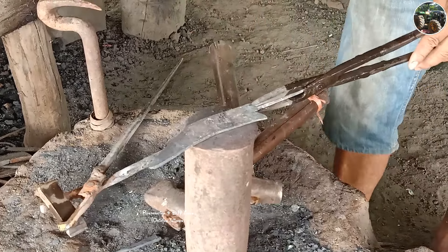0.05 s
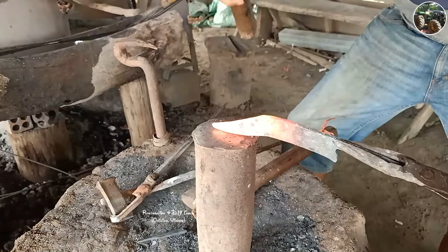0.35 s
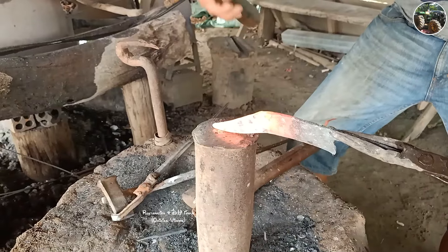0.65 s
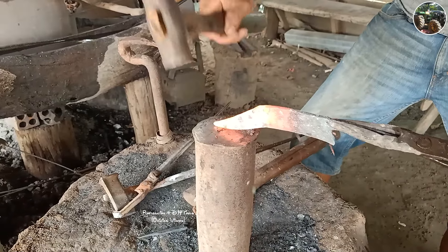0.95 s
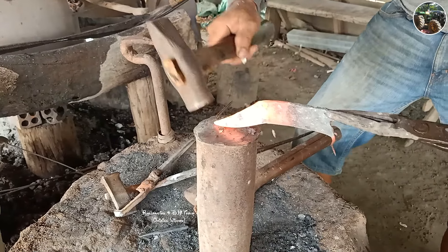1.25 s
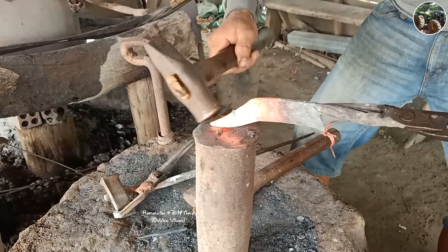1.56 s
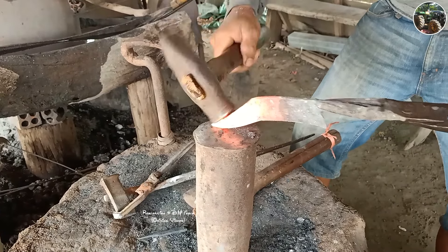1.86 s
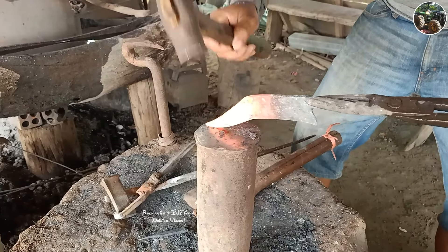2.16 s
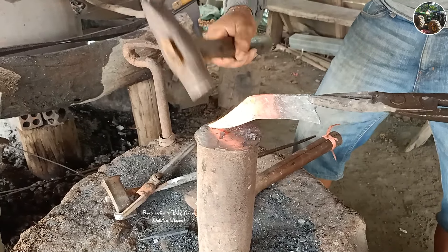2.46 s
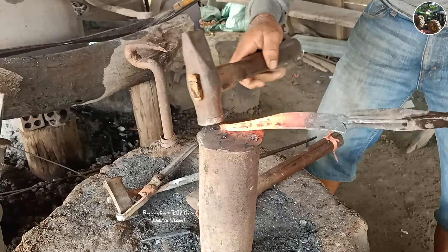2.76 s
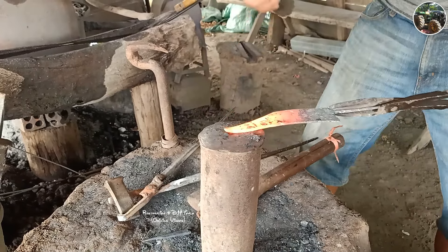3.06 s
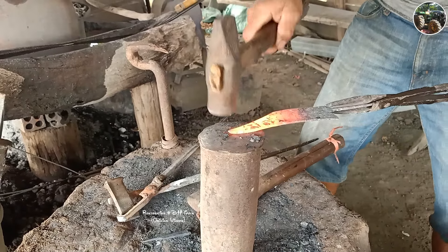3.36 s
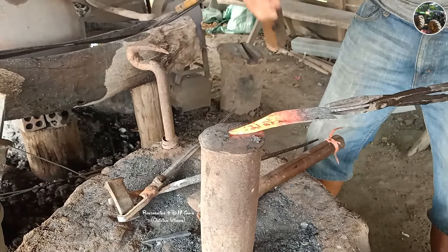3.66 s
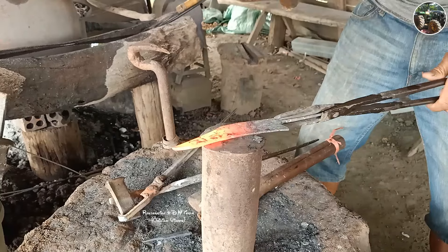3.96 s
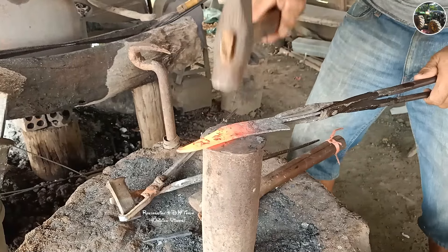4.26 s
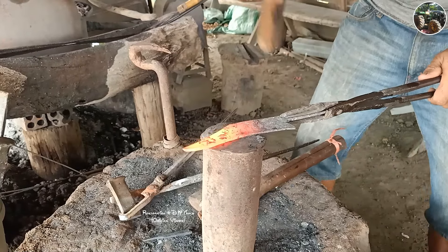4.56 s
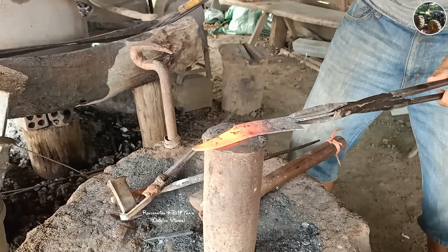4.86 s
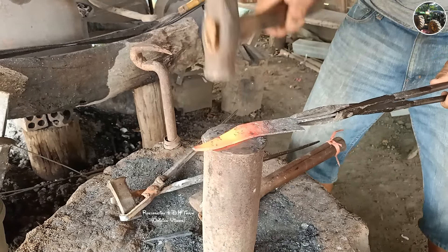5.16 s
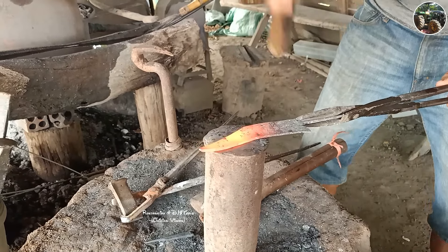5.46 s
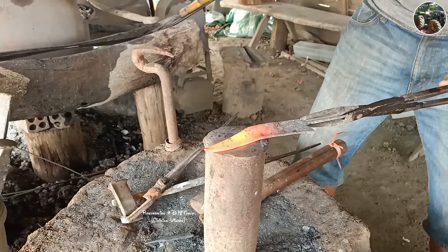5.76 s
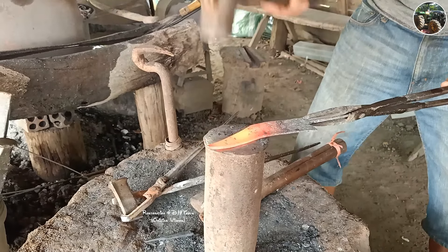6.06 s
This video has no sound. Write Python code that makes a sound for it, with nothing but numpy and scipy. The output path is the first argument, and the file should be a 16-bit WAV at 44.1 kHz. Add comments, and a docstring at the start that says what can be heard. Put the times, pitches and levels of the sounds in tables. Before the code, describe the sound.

A hand hammer strikes a hot steel blade on a small anvil set in a stump. Seven quick blows land as short clanks with a woody knock. The hammer drops and bounces in a fast fading rattle, then seven slower, brighter blows follow, loud enough to distort slightly. The microphone is close, with the anvil a little to the right, in an open shed with a very short echo and faint outdoor rush.

```python
"""A smith's hammer draws out a hot blade on a short post anvil set in a stump, under an open shed roof.
Seven blows land on the edge, the hammer drops and bounces, then seven flat blows overload the stereo
microphone, which stands close by with the anvil slightly to its right. Each contact briefly rings
stump, anvil, hammer head and blade. The shed answers over a soft outdoor rush and a faint far hum."""
import sys
import numpy as np
from scipy import signal
from scipy.fft import rfft, irfft, next_fast_len
from scipy.io import wavfile
from scipy.ndimage import uniform_filter1d, map_coordinates

SR = 44100
rng = np.random.default_rng(int(sys.argv[2]) if len(sys.argv) > 2 else 0)


def generate_wav(signal):
    """Clip the signal to [-1, 1] and save it as 16-bit WAV at the path in sys.argv[1]."""
    frames = np.transpose(np.atleast_2d(signal))
    scaled = np.clip(frames, -1, 1) * 32767
    pcm = np.round(scaled).astype(np.int16)
    wavfile.write(sys.argv[1], SR, pcm)


N = 274302
T = np.arange(SR // 4) / SR  # time within one contact [s]
CLOCK = np.arange(N) / SR  # time within the scene [s]


def hammering():
    """Blows, bounces and blade chatter, each with the shed's answer, heard slightly from the right."""
    # (time [s], strength [dB], flatness [0 = blade on edge, 1 = lying flat],
    #  hammer ring [dB], blade slap [dB], clank pitch [Hz])
    blows = [(0.5499, -10.5, .2, -4.5, -9.5, 1245), (0.9072, -9, 0.03, -15.5, -14, 1175),
             (1.2665, -9.5, 0.3, -5.5, -9, 1133), (1.618, -10, 0.32, -16, -9.5, 1212),
             (1.9557, -14.5, 0.24, -9, -5, 1176), (2.2853, -14.5, 0.52, -6, -2.5, 1172),
             (2.5765, -14, 0.35, -11.5, -4.5, 1175), (3.3996, -10, 0.68, -6.5, -13.5, 1316),
             (3.8059, -9.5, 0.77, 0.5, -5, 1300), (4.26, -10.5, 0.91, -3, -2.5, 1222),
             (4.7239, -11, 0.96, -1, -0.5, 1270), (5.1708, -9, 0.98, -1, -3.5, 1237),
             (5.6092, -10, 0.91, -6.5, -5, 1220), (6.0494, -12.5, 0.96, 1.5, -6.5, 1223)]
    # the loosely held hammer bounces on the anvil: (time [s], strength [dB])
    bounces = [(2.0017, -34), (2.782, -17.5), (2.8433, -21), (2.884, -23), (2.91, -25), (2.9311, -28),
               (2.951, -42.5)]
    # the blade springs back and touches the face: (time [s], strength [dB])
    chatter = [(1.6355, -36), (1.6531, -38)]
    sounds = [(s, amp(db) * contact(*stroke, crack_db=0)) for s, db, *stroke in blows]
    for s, db in bounces:  # bare steel rings the head, hardly the blade, and hardly cracks
        sounds.append((s, amp(db) * contact(0.46, ring_db=5, slap_db=-19, clank_hz=1258, crack_db=-10)))
    sounds += [(s, amp(db) * blade_zing()) for s, db in chatter]
    track = np.zeros((2, N))
    for s, sound in sounds:
        add(track, s, shed(sound))
    # balance at the microphone: (frequency [Hz], left minus right [dB])
    balance = [(60, -9.5), (200, 1), (450, 1.5), (750, -1.5), (1200, -2.5), (1800, 1), (2900, -6.5),
               (5000, -2), (8000, -4.5), (13000, -4)]
    pan = lambda hz: amp(np.array([[.5], [-.5]]) * along(balance, hz))
    bass_hz = 55  # small bodies radiate little bass
    return filtered(track, lambda hz: pan(hz) * 1j * hz / (bass_hz + 1j * hz))


def contact(flatness, ring_db, slap_db, clank_hz, crack_db):
    """One blow: a blade on edge cushions the hammer, so the stump knocks; flat contact rings the steel."""
    # modes of each body: (frequency [Hz], relative level [dB], t60 [s])
    face = [(1192.5, 3.5, 0.017), (1237, 6, 0.017), (1314.5, -11.5, .034), (1410, -29, 0.044)]
    post = [(2061, -12, .035), (2290, -11, .04), (2420, -13, .04), (2652, -3, .05), (2781, 0, .055),
            (2870, -6, .04), (2967, 0, .055)]
    post_high = [(8390, -3, .05), (9470, 0, .08)]
    head = [(3101, 4, 0.022), (3159, 0, .028), (3243, -13, 0.059), (3820, -20, 0.054), (5250, -24, 0.034)]
    edge = [(4210, -7, 0.022), (4286, -7, 0.086), (4380, -8.5, 0.021), (4665, -6, 0.015), (4804, 8, 0.017),
            (5115, -4, .05), (4910, -9.5, 0.042), (5515, 3.5, 0.015)]
    ground = [(61.7, -9, 0.036), (110, 2, 0.036), (147, 2.5, 0.02)]
    # spectra of yielding steel and of its brittle hot scale: (frequency [Hz], relative level [dB])
    crush = [(150, -57), (500, -7), (1000, 4), (1600, 2.5), (2200, 3.5), (3000, -4), (3800, -3),
             (6000, -40), (9000, -51.5), (16000, -72)]
    crack = [(500, -18.5), (2500, 11), (4200, 2.5), (6800, 20), (8200, 4.5), (10000, -3), (12000, -8.5),
             (14000, -2), (16000, -8)]
    # levels run from blade on edge to blade flat
    face_db = between(-10.5, -1, flatness ** 2)
    post_db, high_db = between(-20, 3.5, flatness), between(-54, -24, flatness)
    edge_db, ground_db = between(-37, -3, flatness), between(-42.5, -17, flatness)
    crush_db = max(post_db, ring_db - 4.5) / 2 - 4.5
    clank = [(hz * clank_hz / face[1][0], db, t60) for hz, db, t60 in face]  # tuned by how the blade lies
    out = amp(-1.5) * stump_knock(flatness)
    out += amp(face_db) * ring(clank, attack=.0023, scatter_db=0, spread=.51, loose=.79, width_hz=7.3)
    out += amp(post_db) * ring(post, attack=.00075, scatter_db=-2.5, spread=2.06, loose=.89, width_hz=75)
    out += amp(ring_db - 3) * ring(head, attack=.0014, scatter_db=.8, spread=1.3, loose=.97, width_hz=1.3)
    out += amp(edge_db) * ring(edge, attack=.0003, scatter_db=2.5, spread=1.64, loose=2.2, width_hz=90)
    out += amp(high_db) * ring(post_high, attack=.0003, scatter_db=3.5, spread=1.6, loose=2.2, width_hz=25)
    out += amp(slap_db - 3) * blade_zing()
    out += amp(crush_db) * puff(crush, t60=.025, attack=.00021)
    out += amp(crack_db + slap_db) * puff(crack, t60=.029, attack=.00021)
    thud = ring(ground, attack=.0034, scatter_db=2, spread=1.6, loose=.5, width_hz=4)
    add(out, .002, amp(ground_db) * thud)  # the shock reaches the ground through the stump a moment later
    return out


def stump_knock(flatness):
    """The stump knocks under the anvil; a softer, longer contact favours its low modes."""
    # modes of the wood: (frequency [Hz], relative level [dB], t60 [s])
    wood = [(222.2, -16, 0.053), (293.6, -13.5, 0.049), (435, -12.5, 0.056), (503.8, -23, 0.11),
            (563.3, -5.5, 0.028), (651.6, -2, 0.026), (711.2, 0.5, 0.026), (751, -7, 0.018),
            (828, -11.5, 0.031), (958.6, -10, 0.032)]
    tilt_db = 2.05 + 0.37 * flatness ** 2
    knock = ring(wood, attack=.0023, scatter_db=1.2, spread=.57, loose=.36, width_hz=2, tilt_db=tilt_db)
    radiate_hz = 140  # the stump radiates little below its lowest mode
    return filtered(knock, lambda hz: -hz ** 2 / (radiate_hz ** 2 - hz ** 2 + 1j * hz * radiate_hz))


def blade_zing():
    """The thin blade rings where it slaps the face."""
    # modes of the blade: (frequency [Hz], relative level [dB], t60 [s])
    blade = [(5670, -1, 0.01), (5770, 3, 0.021), (5893, -9.5, 0.01), (6095, 15.5, 0.022),
             (6730, -16.5, 0.072), (6496, 7, 0.039), (6810, -2.5, 0.027), (6480, -10.5, 0.066),
             (6950, 4, 0.034), (7176, -7.5, 0.029), (7190, 0.5, 0.036), (7660, -27.5, .035)]
    return ring(blade, attack=.00024, scatter_db=1, spread=1.55, loose=2.7, width_hz=70)


def ring(modes, attack, scatter_db, spread, loose, width_hz, tilt_db=0):
    """Damped modes, tilted per octave; phases part between channels (spread) and between blows (loose)."""
    out = np.zeros((2, len(T)))
    for hz, db, t60 in modes:
        size, phase, apart = rng.standard_normal(3)
        # the shifting contact unsettles each mode, which widens its line
        drift = np.cumsum(rng.standard_normal(len(T))) * np.sqrt(2 * np.pi * width_hz / SR)
        drift = uniform_filter1d(drift, size=90)
        stereo_phase = np.array([[-1], [1]]) * spread * (1 + .5 * apart) / 2
        angle = 2 * np.pi * hz * T + drift + loose * phase + stereo_phase
        gain = amp(db + scatter_db * size + tilt_db * np.log2(hz))
        out += gain * np.sin(angle) * fade(t60, attack)
    return burst(out)


def puff(spectrum, t60, attack):
    """A short burst of noise: the crunch under the hammer."""
    return burst(noise(len(T), spectrum) * fade(t60, attack))


def shed(x, tail_db=-17.5, build_s=0.0074):
    """Near surfaces echo the blow, then a short diffuse tail builds up and dies band by band."""
    # decay under the roof: (frequency [Hz], t60 [s])
    decay = [(100, 0.1), (500, 0.14), (1500, 0.1), (3000, 0.14), (7000, 0.13), (10000, 0.067),
             (16000, 0.13)]
    # near reflections: (delay [s], level [dB])
    walls = [(.0085, -29.5), (0.0119, -23), (0.0245, -32)]
    hz, t, bands = signal.stft(noise(len(T), [(100, 0.0057), (16000, 0.012)]), SR, nperseg=256)
    bands = bands * amp(-60 * t / along(decay, hz)[:, None])
    tail = signal.istft(bands, SR, nperseg=256)[1][:, :len(T)]
    tail *= 1 - np.exp(-(T / build_s) ** 2)
    tail /= np.linalg.norm(tail[0])
    out = x + amp(tail_db) * signal.fftconvolve(x, tail, axes=1)[:, :len(T)]
    for delay, db in walls:
        add(out, delay, amp(db) * x)
    return out


def shuffling():
    """The smith shuffles softly: brief swells of dull noise."""
    # each shuffle: (time [s], length [s], level [dB])
    shuffles = [(0.047, 0.041, -54), (0.194, 0.17, -54), (5.097, 0.091, -48), (5.44, 0.015, -45.5)]
    # their spectrum: (frequency [Hz], relative level [dB])
    scuff = [(30, -22.5), (90, 5.5), (190, -0.5), (380, 3.5), (800, -14), (3000, -18.5), (10000, -69.5)]
    swells = sum(amp(db) * np.exp(-2 * ((CLOCK - s) / length) ** 2) for s, length, db in shuffles)
    return swells * noise(N, scuff)


def yard():
    """Beyond the shed: an outdoor rush, a low rumble and a narrow, far hum; faint scraping of the blade
    flutters in the hiss."""
    # spectrum of the open air as the microphone colours it, with peaks near 3 and 6.9 kHz: (frequency [Hz],
    # relative level [dB])
    air_spectrum = [(18, -54.5), (30, -42), (107, -1.5), (171, 2), (296, -9), (404, -14.5), (497, -11),
                    (567, -14), (774, -10.5), (1480, -15.5), (2990, -11), (3980, -23.5), (6880, -8),
                    (9390, -32), (15000, -48.5)]
    # course of the rush: (time [s], relative midrange level [dB], treble level [dB])
    rush_levels = [(0.6, -60.5, -64.5), (0.93, -60, -66.5), (1.1, -54.5, -60.5), (1.57, -61.5, -67.5),
                   (1.85, -55.5, -62.5), (2.19, -55.5, -64.5), (2.38, -60, -66), (2.63, -59.5, -72),
                   (2.75, -56.5, -60.5), (3.66, -59.5, -63.5), (4.05, -58, -56.5), (4.72, -61.5, -66.5),
                   (6.0, -53.5, -64), (6.2, -50.5, -58)]
    # course of the hum: (time [s], level [dB])
    hum_levels = [(0, -66), (1.4, -60.5), (3.5, -58.5), (4.6, -68)]
    air = noise(N, air_spectrum)
    rush_db, hiss_db = curves(rush_levels)
    rumble_db, hum_db = -58, curves(hum_levels)[0]
    rumble_hz, hiss_hz, hum_hz, hum_width_hz = 450, 4100, 402, 22
    low = lambda hz: 1 / (1 + (hz / rumble_hz) ** 4)
    high = lambda hz: 1 - 1 / (1 + (hz / hiss_hz) ** 8)
    narrow = lambda hz: 1 / (1 + ((hz - hum_hz) / hum_width_hz) ** 2)
    rumble = amp(rumble_db + 1.5 * wobble(11)) * unit(filtered(air, low))
    rush = amp(rush_db + 6) * unit(filtered(air, lambda hz: 1 - low(hz) - high(hz)))
    hiss = amp(hiss_db + 0.76 * wobble(28)) * unit(filtered(air, high))
    hum = amp(hum_db) * unit(filtered(air, narrow))
    return rumble + rush + hiss + hum


def dip(at_s=0.2402, before_db=4, depth_db=-44, recovery_s=0.064):
    """A gain curve: the background drops abruptly and creeps back."""
    since = np.maximum(CLOCK - at_s, 0)
    db = np.where(CLOCK < at_s, before_db, depth_db * np.exp(-since / recovery_s))
    return uniform_filter1d(amp(db), size=128)


def noise(size, spectrum):
    """Coloured stereo noise of rms 1, alike on both sides only in the bass."""
    # diffuse sound at the microphone: (frequency [Hz], left-right correlation [-1 to 1])
    likeness = [(60, 1), (300, 0.81), (700, 0.4), (1400, -0.41), (3000, 0.072), (15000, -0.2)]
    turn = lambda hz: np.arccos(np.clip(along(likeness, hz), -1, 1)) / 2
    colour = lambda hz: amp(along(spectrum, hz)) * [np.cos(turn(hz)), np.sin(turn(hz))]
    mid, side = filtered(rng.standard_normal((2, size)), colour)
    return unit(np.array([mid + side, mid - side]))


def amp(db):
    """Decibels to gain."""
    return 10 ** (np.asarray(db) / 20)


def unit(x):
    """Scale to rms 1."""
    return x / np.sqrt(np.mean(x ** 2) + 1e-20)


def burst(x):
    """Scale a short stereo sound to the energy of 10 ms at rms 1."""
    return x / np.sqrt(np.sum(x ** 2) / 2 / (SR / 100))


def fade(t60, attack):
    """A fast rise and an exponential decay, both in seconds."""
    return amp(-60 * T / t60) * (1 - np.exp(-T / attack))


def between(start, end, share):
    """The value a share of the way from start to end."""
    return start + share * (end - start)


def along(points, hz):
    """Interpolate (frequency, value) points on a log axis."""
    freqs, values = np.transpose(points)
    return np.interp(np.log(hz + 1), np.log(freqs + 1), values)


def curves(rows):
    """One value per sample for each column after the time."""
    times, *columns = np.transpose(rows)
    return [np.interp(CLOCK, times, column) for column in columns]


def wobble(rate):
    """A smooth random curve, rate knots a second."""
    return map_coordinates(rng.standard_normal(int(N * rate / SR) + 4), [CLOCK * rate])


def filtered(x, response):
    """Filter x by a response given as a function of frequency."""
    n = x.shape[-1]
    padded = next_fast_len(n + 4096)
    return irfft(rfft(x, padded) * response(np.fft.rfftfreq(padded, 1 / SR)), padded)[..., :n]


def add(track, s, x):
    """Mix x into the track from time s on."""
    part = track[:, max(round(s * SR), 0):][:, :x.shape[1]]
    part += x[:, :part.shape[1]]


def gain_control(x, duck_db=2, above_db=-32.5, attack_s=0.09, release_s=0.34):
    """Loud sounds turn the recorder's gain down a little; it recovers slowly."""
    loud = np.abs(x).max(axis=0) > amp(above_db)
    since_loud = CLOCK - np.maximum.accumulate(np.where(loud, CLOCK, -np.inf))
    pole = np.exp(-1 / (attack_s * SR))
    ducking = signal.lfilter([1 - pole], [1, -pole], np.exp(-since_loud / release_s))
    return x * amp(-duck_db * ducking)


def scene():
    """The anvil up close, over a gently wavering background of yard and shuffles."""
    return hammering() + (yard() + shuffling()) * dip() * amp(0.63 * wobble(14))


def record(dry):
    """The recorder rides its gain, flattens the loudest peaks and keeps nothing above its band limit."""
    ceiling, hardness, top_hz = .97, 10, 15800
    held = gain_control(dry)
    clipped = held / (1 + np.abs(held / ceiling) ** hardness) ** (1 / hardness)
    return filtered(clipped, lambda hz: 1 / (1 + (hz / top_hz) ** 120))


dry = scene()
out = record(dry)
generate_wav(out)
```